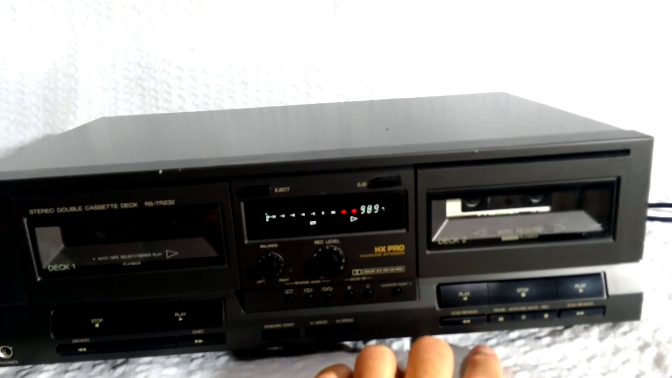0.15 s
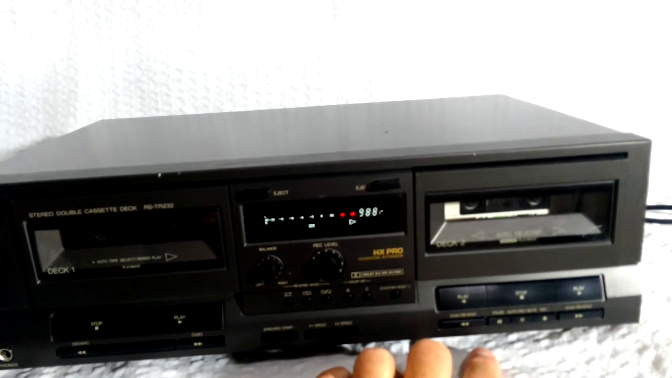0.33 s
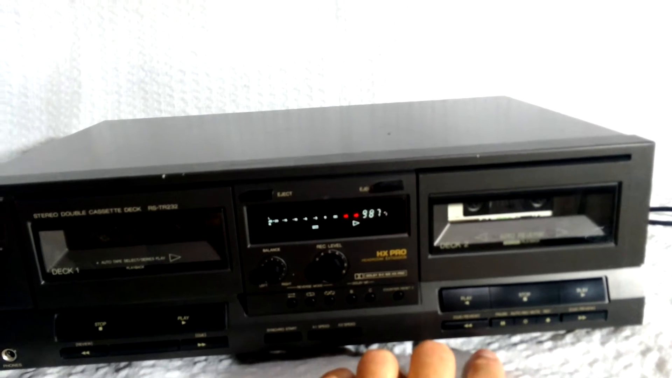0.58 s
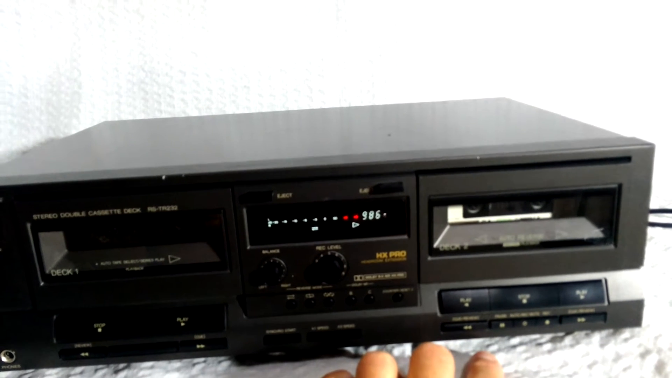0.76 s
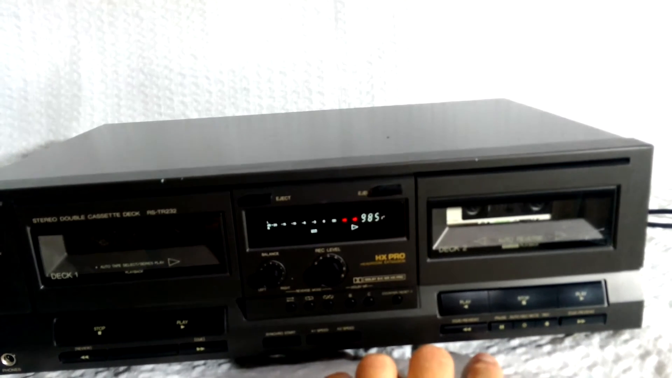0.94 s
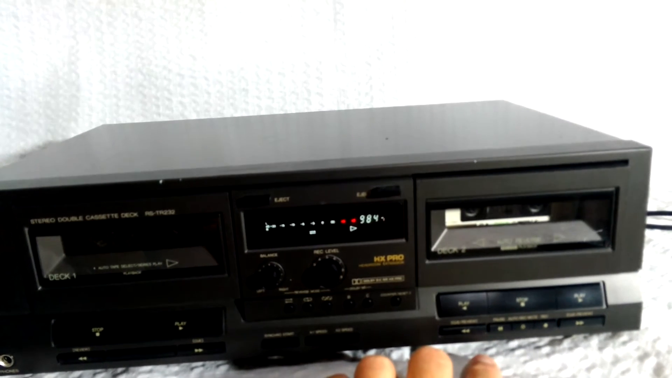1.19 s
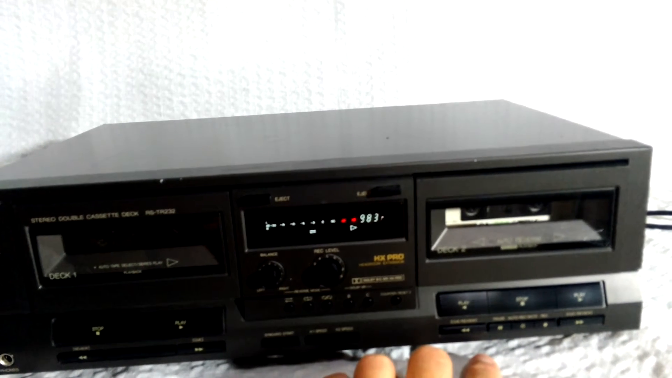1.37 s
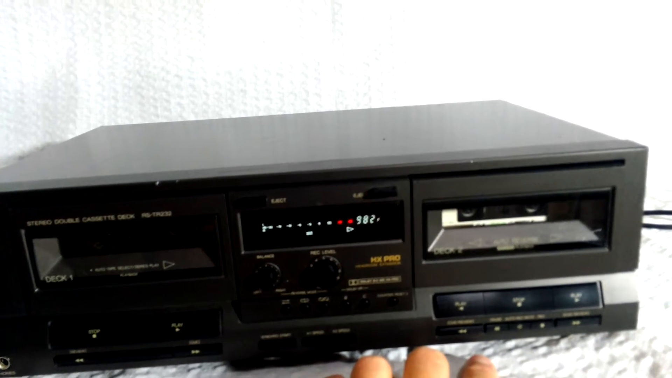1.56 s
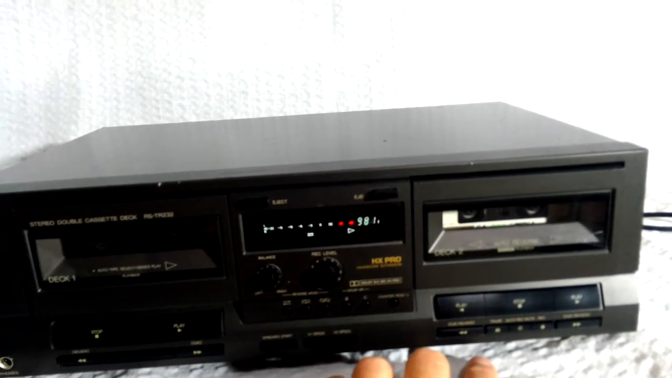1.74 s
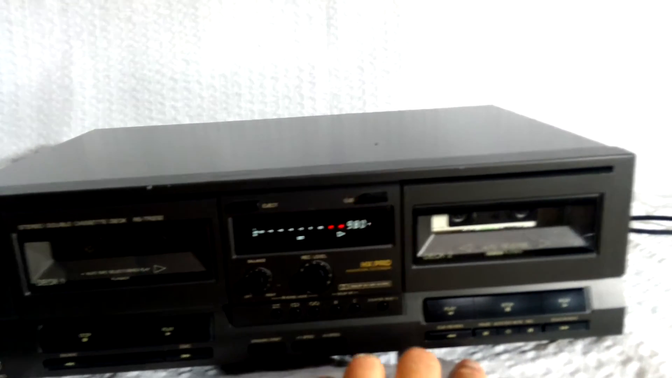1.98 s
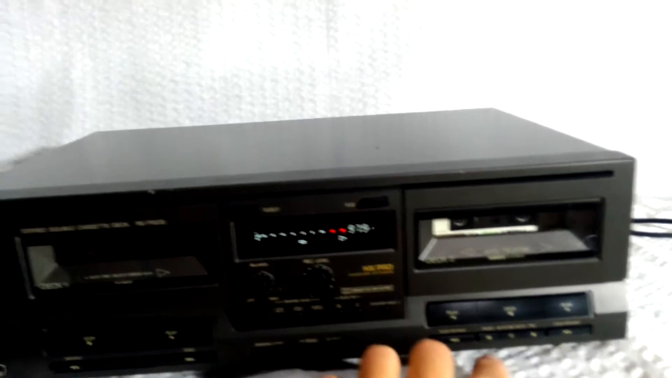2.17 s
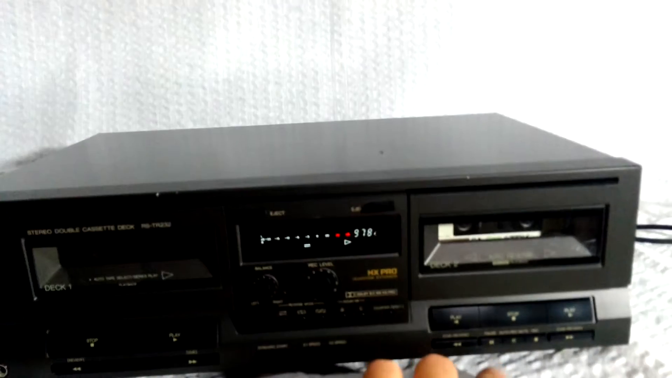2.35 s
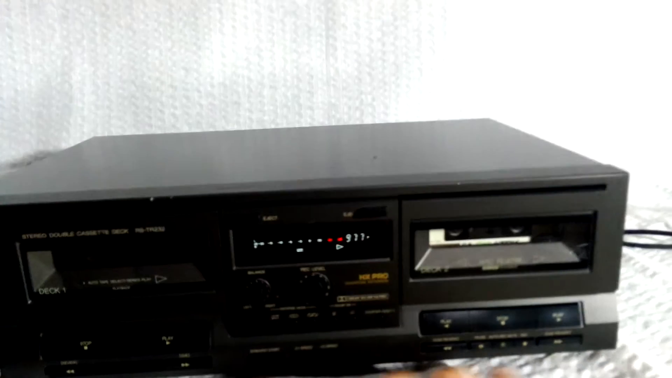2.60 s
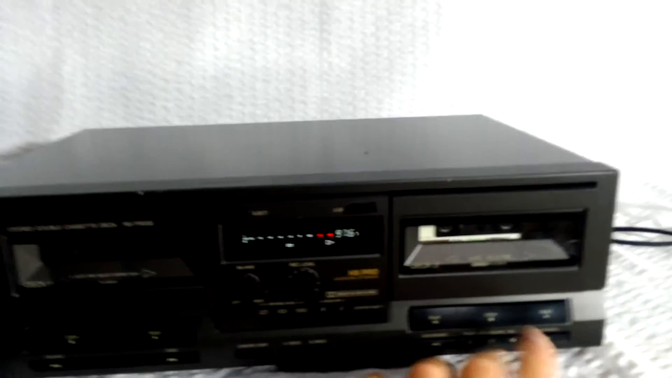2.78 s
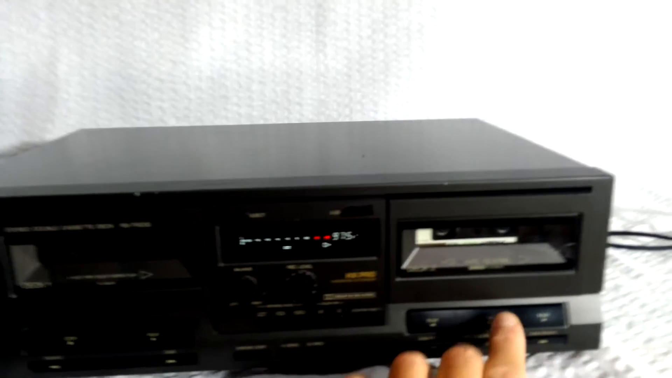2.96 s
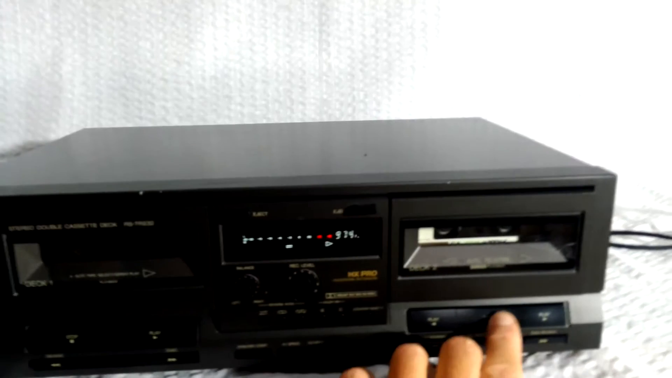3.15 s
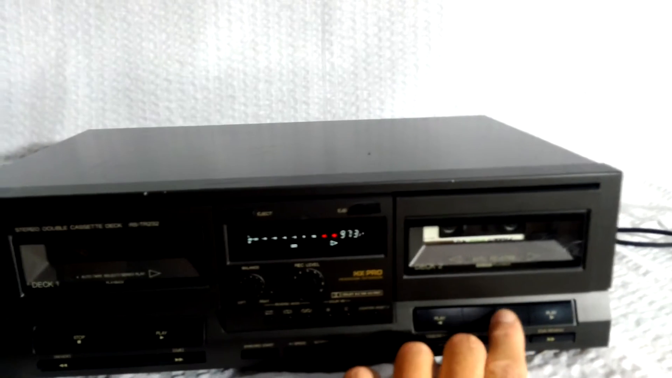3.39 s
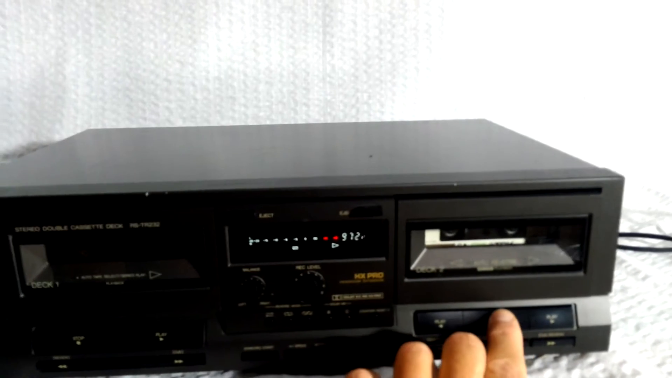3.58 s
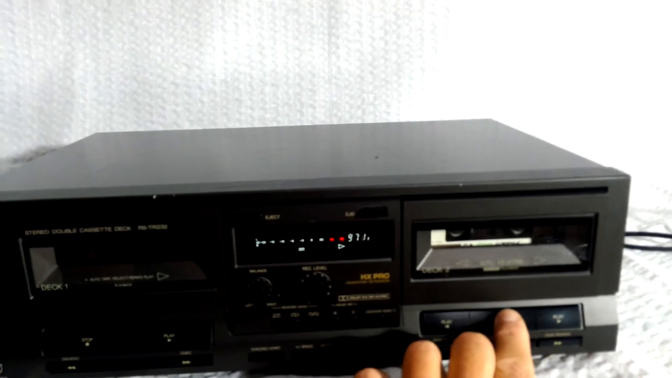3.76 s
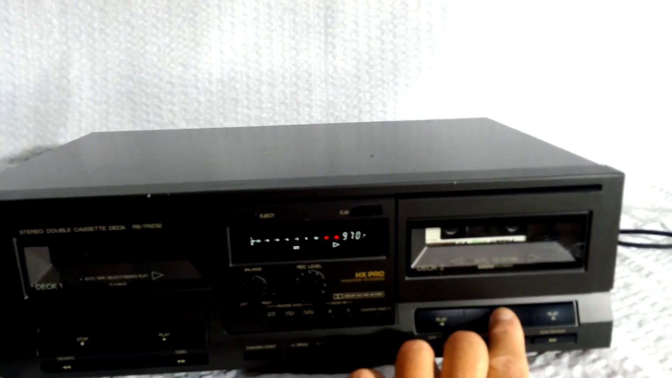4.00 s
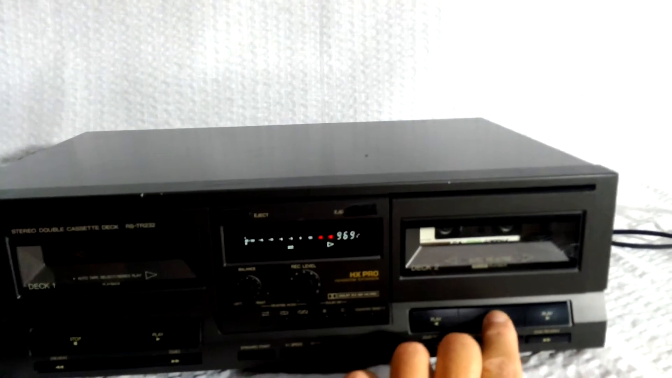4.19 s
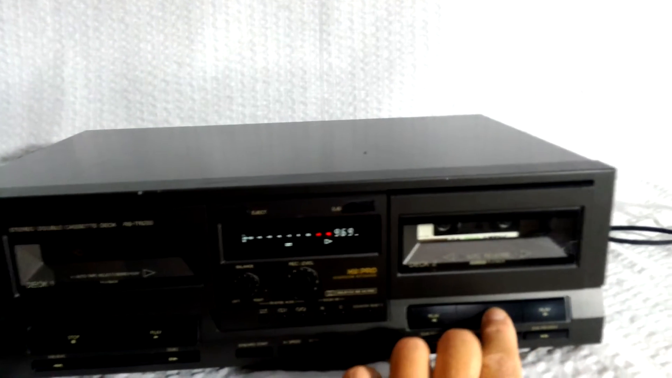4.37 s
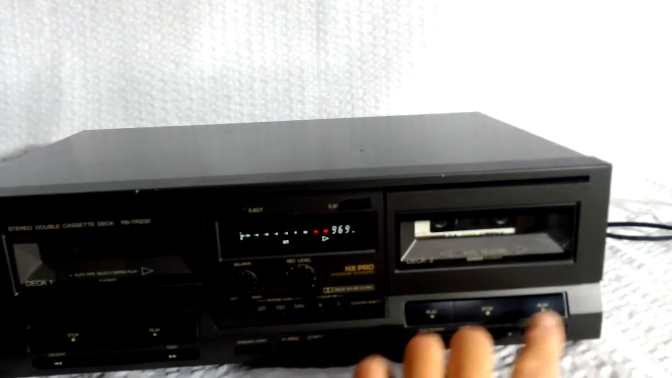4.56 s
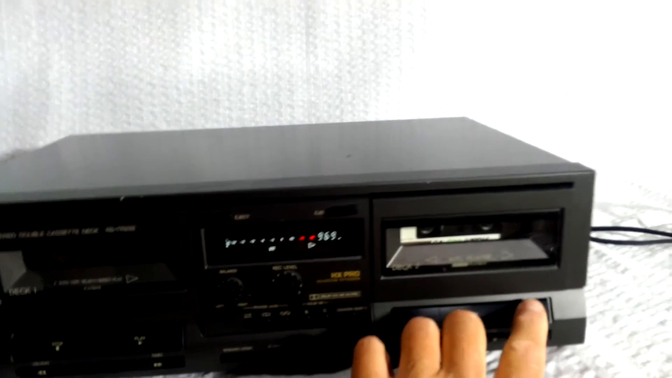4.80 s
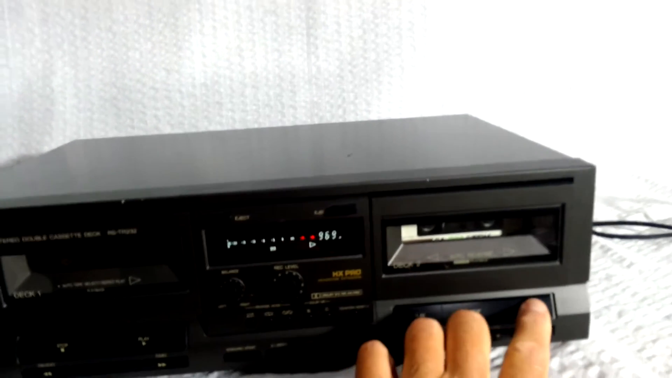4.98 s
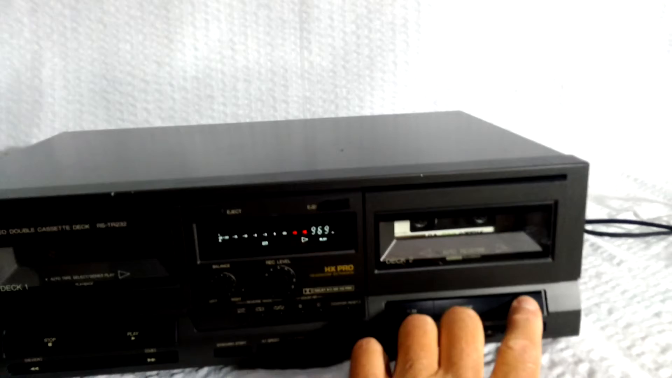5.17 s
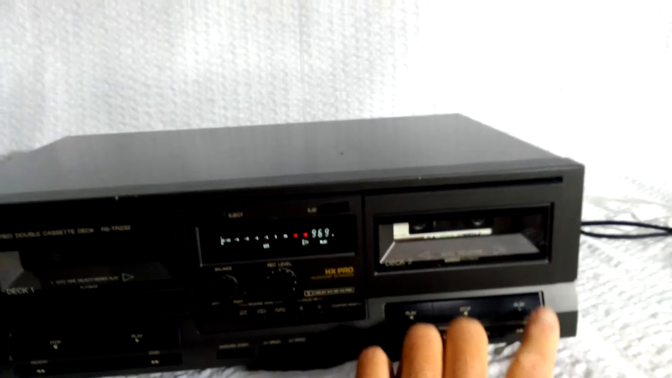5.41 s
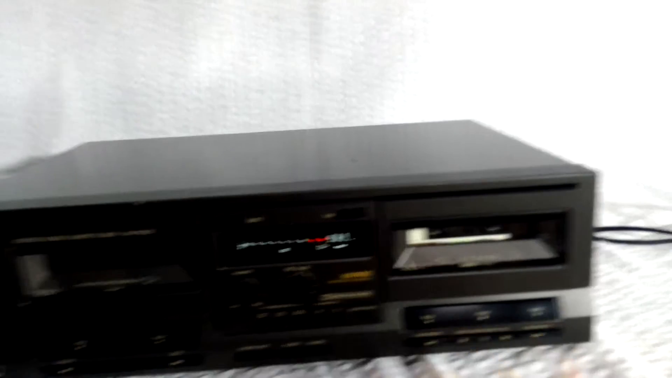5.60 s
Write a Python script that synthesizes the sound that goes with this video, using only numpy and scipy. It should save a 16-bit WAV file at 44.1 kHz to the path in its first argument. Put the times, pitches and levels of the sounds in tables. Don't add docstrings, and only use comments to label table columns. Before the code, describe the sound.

Close to a small, treble-heavy microphone in a quiet room, a cassette deck winds tape from 0 to about 4.4 s. The sound is faint and mechanical: a fine gritty gear whir swelling and dipping about seven and a half times a second, with a small hollow knock and dry rub at each turn. The low knock weakens over time while the rubbing slowly changes character. Beneath lie a thin steady high whine, a very faint buzzing hiss and mains hum, continuing throughout. At 4.34 s a key ticks, and at 4.4 s a loud, bright, clattering clunk stops the reel, with small rattles until about 4.5 s. Only electronics and room hiss remain. Light ticks come at 5.1 s, then clacks and loose rattles at 5.36 and 5.46 s over a faint low rumble, and the sharpest, loudest snap at 5.54 s, ringing briefly with a short room tail.

```python
import sys
import numpy as np
from scipy import signal
from scipy.fft import rfft, irfft, next_fast_len
from scipy.io import wavfile
from scipy.ndimage import uniform_filter1d

SR = 44100
rng = np.random.default_rng(int(sys.argv[2]) if len(sys.argv) > 2 else 0)


def boost(x):
    u = np.asarray(x, float) / 20
    return 10 ** u


def to_wav(sig):
    pcm = np.clip(np.atleast_2d(sig), -1, 1) * 32767
    pcm = np.round(pcm).astype(np.int16)
    wavfile.write(sys.argv[1], SR, pcm.T)


N = 248724

TURN_HZ, STOP_S = 7.54, 4.39


def unit(x):
    return x / np.sqrt(np.mean(x ** 2))


def colour(x, points):
    hz, db = np.transpose(points)
    n = next_fast_len(len(x))
    f = np.maximum(np.arange(n // 2 + 1) * SR / n, 1)
    gain = boost(np.interp(np.log(f), np.log(hz), db))
    return irfft(rfft(x, n) * gain, n)[:len(x)]


def ring(x, hz, width_hz):
    return signal.lfilter(*signal.iirpeak(hz, hz / width_hz, fs=SR), x)


def push(t, ms):
    u = np.maximum(t, 0) * 1000 / max(ms, .1)
    return u * np.exp(1 - u)


def walk(rate_hz):
    k = int(SR / rate_hz)
    held = np.repeat(rng.standard_normal(N // k + 1), k)
    return unit(uniform_filter1d(uniform_filter1d(held, k), k)[:N])


def modes(table, t, chance):
    hz, db, t60_s = np.transpose(table)[:, :, None]
    detune, phase_turns, strength = chance[:3 * len(table)].reshape(3, -1, 1)
    turns = hz * (1 + 0.0182 * detune) * t + phase_turns
    decay = 1000. ** (-t / t60_s)
    return np.sum(boost(db + 3 * strength) * np.sin(2 * np.pi * turns) * decay, axis=0)


def still_room():
    # frequency [Hz], density [dB per Hz].
    spectrum = [(20, -36), (50, -13), (90, -12), (200, -5), (380, -7), (480, -11), (900, -14.5),
                (2500, -22), (4800, -22), (5800, -10.5), (7000, -21.5), (9600, -20.5), (10800, -14.5),
                (16000, -20.5)]
    return boost(-62 + .5 * walk(1.7)) * unit(colour(rng.standard_normal(N), spectrum))


def electronics(t):
    # frequency [Hz], level [dB rms].
    hum = [(120.0, -68), (103.3, -81), (138.6, -76), (211.2, -80), (233.5, -79), (301.5, -81), (356.3, -75),
           (75.4, -88)]
    # frequency [Hz], level [dB rms].
    faint = [(4980, -81), (5728, -78.5), (5975, -80), (6724, -85), (7472, -111)]
    # time [s], pitch of the second multiple [Hz].
    whine_pitch = [
        (0.0, 5523),
        (0.17, 5515.5),
        (5.64, 5520),
    ]
    # multiple [-], level [dB rms].
    whine_orders = [(2, -58.5), (3, -69.5), (4, -69.5), (5, -87)]
    scan_hz, wobble_hz = 60.256, 16.32
    pitch_hz = np.interp(t, *np.transpose(whine_pitch)) + 2.5 * walk(8)
    pitch_hz += 7.5 * np.cos(2 * np.pi * wobble_hz * t - 2.3)
    phase = np.pi * np.cumsum(pitch_hz) / SR
    whine = sum(boost(db + 0.73 * walk(9.6)) * np.sin(k * phase) for k, db in whine_orders)
    tones = sum(boost(db + .7 * walk(3)) * np.sin(2 * np.pi * hz * t + .3 * walk(2) + hz)
                for hz, db in [*hum, *faint])
    scan = np.exp(.75 * np.cos(2 * np.pi * scan_hz * t + 1.68))
    hiss = np.sqrt(2) * np.sin(2 * np.pi * 12370 * t + 1.9 * walk(400))
    hiss += 0.51 * unit(ring(rng.standard_normal(N), 12650, 700))
    return np.sqrt(2) * (whine + tones) + boost(-67.0) * scan * hiss


def carriage(t):
    start_s, level_db, hz, width_hz = 5.34, -66, 260, 160
    low = ring(ring(rng.standard_normal(N), hz, width_hz), hz, width_hz)
    fade_in = np.clip((t - start_s) / 0.022, 0, 1)
    return boost(level_db + 2.5 * walk(23.6)) * fade_in * unit(low)


def whir(t):
    # frequency [Hz], density [dB per Hz].
    spectrum = [(400, -42.5), (730, -5), (950, -22.5), (1200, -3.5), (1450, -17), (1680, -11),
                (2100, -14.5), (3900, -13), (4550, -9.5), (5000, -7.5), (5750, -3), (6200, -6.5),
                (7200, -17.5), (10000, -27.5)]
    grit = rng.standard_normal(N) * boost(1.13 * walk(300))
    whole = boost(-58 + .6 * walk(6.67)) * unit(colour(grit, spectrum))
    low = colour(whole, [(3900, 0), (4600, -40)])
    high = whole - low
    load = np.tanh(2 * np.cos(2 * np.pi * (t * TURN_HZ - .9)))
    return boost(2.2 * load - 1) * low + boost(1.6 * load + 1.2 * walk(14)) * high


def reel(t):
    # place at first [ms], place at the stop [ms], ring [Hz],
    # level at first [dB], level at the stop [dB].
    knocks = [(5.04, 3.19, 1205, -51.5, -46), (17.7, 5.9, 1212, -59, -60), (11.04, 2.7, 715, -45.5, -49),
              (8.33, 1.87, 1680, -57, -59), (5.62, 3.3, 4550, -65, -58), (85.8, 82, 1650, -63, -53.5),
              (95.8, 76, 1660, -53, -62), (92.7, 97, 1217, -57, -63.5), (97.5, 80, 1230, -54, -57),
              (122, 76, 1250, -54, -72.5), (120.6, 100, 1260, -59, -83), (117, 120, 780, -103, -90)]
    # place [ms], push [ms], ring [Hz], level at first [dB], at the stop [dB].
    rubs = [(3, 4.8, 2660, -58.5, -70.5), (84.4, 5, 3170, -76, -58), (91, 8.7, 3000, -61, -67.5),
            (103.6, 8.5, 2930, -58, -78), (80.5, 6.3, 4830, -58.5, -62.5), (92, 16, 2250, -69, -77.5),
            (93, 6, 5900, -71, -54.5), (90, 8.7, 724, -79, -64.5), (94, 13, 1675, -63.5, -74),
            (93, 33, 1030, -64.5, -75), (98, 18.5, 1196, -60.5, -71)]
    # time [s], gain [dB].
    low_knock = [
        (0, -17),
        (.3, 0),
        (1.5, -1.5),
        (2.2, -6),
        (4.4, -13.5),
    ]
    # frequency [Hz], width [Hz].
    hub = [(715, 47), (1040, 370), (1200, 200), (1670, 63), (2250, 210), (2850, 880), (3100, 350),
           (4700, 410), (5900, 1000)]
    motor_hz, gear_turns, gear_peak_s = 377.7, 3, 3.82
    turn, piled = (t * TURN_HZ).astype(int), t / STOP_S
    gear_db = piled * np.cos(2 * np.pi * (t - gear_peak_s) * TURN_HZ / gear_turns)
    out = boost(-75.0) * np.sqrt(2) * np.sin(2 * np.pi * motor_hz * t + 0.9 * walk(1.86))
    for first_ms, last_ms, hz, first_db, last_db in knocks:
        width_hz = np.interp(hz, *np.transpose(hub))
        place_s = (first_ms + (last_ms - first_ms) * piled) / 1000
        since = (t - place_s) % (1 / TURN_HZ)
        db = first_db + (last_db - first_db) * piled + 0.44 * rng.standard_normal(N // 4000)[turn]
        if hz < 900:
            db = db + np.interp(t, *np.transpose(low_knock))
        grain = np.sin(2 * np.pi * hz * since) + 1.1 * rng.standard_normal(N)
        out = out + 1.37 * ring(boost(db) * push(since, 1.49) * grain, hz, width_hz)
    for place_ms, push_ms, hz, first_db, last_db in rubs:
        width_hz = np.interp(hz, *np.transpose(hub))
        since = (t - place_ms / 1000) % (1 / TURN_HZ)
        db = first_db + (last_db - first_db) * piled + gear_db
        grain = rng.standard_normal(N) * np.sqrt(SR / width_hz / np.pi)
        rub = ring(boost(db) * push(since, push_ms) * grain, hz, width_hz)
        out = out + 1.02 * ring(rub, hz, 0.9 * width_hz)
    return out


def jolts(t):
    # start [s], level [dB], ring [Hz], push [ms].
    table = [(4.343, -38, 2290, 1.6), (4.344, -37, 3304, 2), (4.346, -53, 1160, 4), (4.378, -50, 1250, 1.8),
             (4.393, -34, 1620, 1.5), (4.395, -60, 65, 10), (4.399, -35, 730, 4.3), (4.4, -56, 190, 12),
             (4.403, -32, 1653, 6), (4.402, -38, 1160, 4), (4.406, -49, 291, 10), (4.42, -52, 1630, 30),
             (4.466, -51, 310, 5.9), (5.357, -46, 1106, 3.1), (5.362, -44, 1970, 5.4),
             (5.478, -46, 2750, 3.7), (5.478, -44, 3700, 3.5)]
    return sum(boost(db) * push(t - s, ms) * np.sin(2 * np.pi * hz * (t - s)) for s, db, hz, ms in table)


def contacts():
    # start [s], peak [dB], ring [Hz], body re peak [dB], push [ms].
    clear_blows = [(4.343, -23.5, 5520, -9, 0.65), (4.349, -34, 5600, -4, 1.5),
                   (4.3928, -18, 5700, -15, 0.89), (4.4019, -7.5, 5744, -14.5, 1.4),
                   (4.4043, -13, 5660, -12.5, 1.2), (4.4074, -12.5, 5900, -15, 1),
                   (4.4103, -17, 5860, -20, 2), (4.4376, -28, 5670, -17, 1.2), (4.4542, -25, 5570, -16, 1),
                   (4.467, -27.5, 5550, -10, 1.2), (5.1094, -34, 5700, -2, 0.88),
                   (5.1135, -37, 5750, -2, 0.71), (5.2853, -56.5, 5350, 7.5, 1.7),
                   (5.291, -54, 5600, 0, 1.3), (5.3367, -45, 5590, -5, 2.3),
                   (5.3609, -24, 5890, -11.5, 1.34), (5.419, -33.5, 5860, -21, 1.6),
                   (5.46, -17, 5640, -23, 0.73), (5.477, -26.5, 5920, -13.5, 1.5),
                   (5.5404, -6, 5580, -31.5, 0.91), (5.5423, -19, 5900, -20, 0.59),
                   (5.5453, -23, 6250, -19, 0.82), (5.566, -24, 5940, -14.5, 1.2),
                   (5.608, -47, 5850, -5, 1.5)]
    # start [s], length [s], first level [dB], last level [dB],
    # body re peak [dB].
    clatters = [(4.387, 0.014, -28, -14, -14), (4.414, .02, -29, -35, -5), (4.439, .025, -41.5, -31, -0.5),
                (4.472, 0.056, -50, -55, 4), (5.351, 0.0076, -28.5, -24, -13),
                (5.365, 0.012, -28, -38, -13), (5.384, 0.011, -38, -35, -10), (5.423, 0.021, -44, -57, -10),
                (5.462, 0.0088, -32, -36, -14), (5.48, 0.015, -32.5, -32, -12.5),
                (5.546, .012, -29, -29, -10.5), (5.568, .014, -26, -38, -13)]
    count = 4
    start, length, first_db, last_db, body_db = np.transpose(clatters)[:, :, None]
    luck = rng.standard_normal((len(clatters), 5, count))
    place = (np.arange(count) + .5 + .5 * np.tanh(luck[:, 0])) / count
    db = first_db + (last_db - first_db) * place + 0.5 * luck[:, 1] - 2
    hz = 5725 + 195 * luck[:, 2]
    crack_db = -9.5 + 1.5 * luck[:, 3]
    push_ms = 1.29 * np.exp(0.23 * luck[:, 4])
    bounces = [start + length * place, db, hz, body_db + 0 * place, crack_db, push_ms]
    blows = [(s, db, hz, body_db, -17.5, ms) for s, db, hz, body_db, ms in clear_blows]
    return np.vstack([blows, np.reshape(bounces, (len(bounces), -1)).T])


def strikes(hits):
    # frequency [Hz], level [dB], t60 [s].
    chassis_modes = [(310, -11.5, 0.09), (409, -17, 0.12), (710, -18, 0.031), (865, -27, 0.058),
                     (1108, -5.5, 0.051), (1160, -28, 0.016), (1640, -0.5, 0.047), (2000, -8, 0.019),
                     (2190, 3.5, 0.02), (2620, 0, 0.021), (3306, 11.5, 0.014), (3760, -3, 0.022),
                     (4600, -5, 0.018)]
    # frequency [Hz], level [dB], t60 [s].
    latch_modes = [(4630, 0, 0.031), (5100, 3.5, 0.033), (5300, -15, 0.026), (5744, -15, .035),
                   (6480, -4, .045), (6180, 2.5, .04), (6500, -4, 0.032), (6400, 1, 0.035),
                   (6640, 0, 0.044)]
    echo_t60_s, echo_db, crack_tail_s = 0.31, -11.5, 0.0088
    crack_per_db = 0.13
    out, t = np.zeros(N + SR), np.arange(SR // 8) / SR
    chance = rng.standard_normal((len(hits), 48))
    scrape = rng.standard_normal((len(hits), SR // 8))
    crack_filter = signal.butter(2, [6800, 14600], "band", fs=SR, output="sos")
    rattle_filter = signal.butter(3, [720, 5000], "band", fs=SR, output="sos")
    for (s, db, hz, body_db, crack_db, ms), luck, noise in zip(hits, chance, scrape):
        force = push(t, ms) ** 2
        ping = force * np.sin(2 * np.pi * hz * t)
        ping += .7 * ring(ring(force * noise, 5900, 2200), 5900, 3000)
        swell = 1 - np.exp(-t * 1000 / max(ms, .1))
        latch = boost(-20) * swell * modes(latch_modes, t, luck)
        chassis = boost(-14.5) * swell * modes(chassis_modes, t, luck[::-1])
        rattle = (push(t, 2.0 * ms) + 0.18 * swell * np.exp(-t / 0.01)) * noise[::-1]
        chassis += 1.355 * signal.sosfilt(rattle_filter, rattle)
        crack_force = push(t, 0.24 * ms) + 0.44 * swell * np.exp(-t / crack_tail_s)
        crack = boost(crack_db + crack_per_db * (db + 16)) * signal.sosfilt(crack_filter, crack_force * noise)
        i = int(s * SR)
        out[i:i + len(t)] += boost(db) * (ping + latch + boost(body_db) * chassis + crack)
    lag = np.arange(SR // 2) / SR
    tail = rng.standard_normal(SR // 2) * 1000. ** (-lag / echo_t60_s) * (lag > .004)
    tail = colour(tail / np.sqrt(np.sum(tail ** 2)),
                  [(300, 13), (500, 14.5), (800, 5.5), (2000, 4.5), (6000, -2.5), (12000, -2)])
    heard = out[:N] + boost(echo_db) * signal.fftconvolve(out[:N], tail)[:N]
    return colour(heard, [(400, 0), (510, -8), (640, 0), (15500, 0), (15900, -8), (16400, -16), (16600, -60)])


def scene():
    t = np.arange(N) / SR
    running = np.clip((STOP_S + 0.036 - t) / 0.033, 0, 1)
    steady = still_room() + electronics(t) + running * (whir(t) + reel(t))
    steady = colour(steady, [(15740, 0), (15770, -80)])
    return (steady + carriage(t) + jolts(t) + strikes(contacts()))[None]


def low_pass(x):
    return signal.sosfilt(signal.butter(12, 16520, fs=SR, output="sos"), x)


def record(dry):
    return low_pass(dry)


dry = scene()
out = record(dry)
to_wav(out)
```